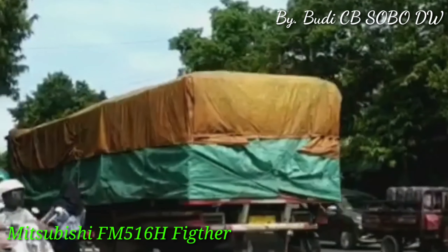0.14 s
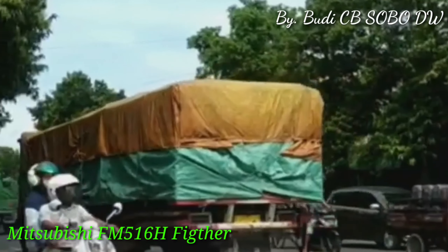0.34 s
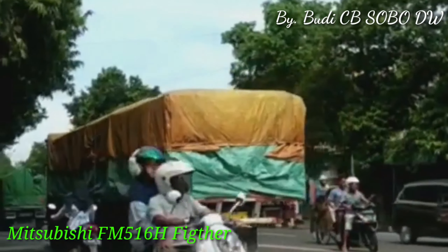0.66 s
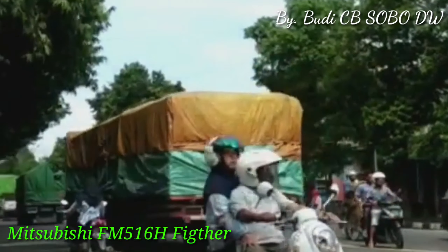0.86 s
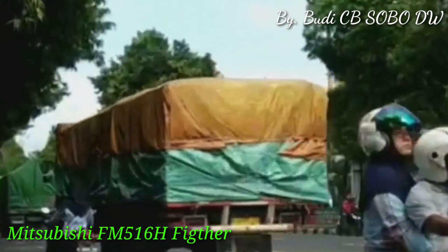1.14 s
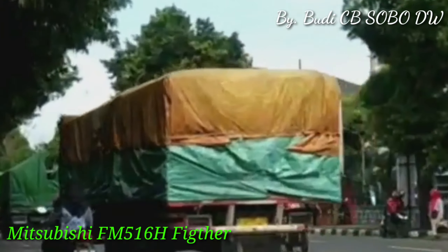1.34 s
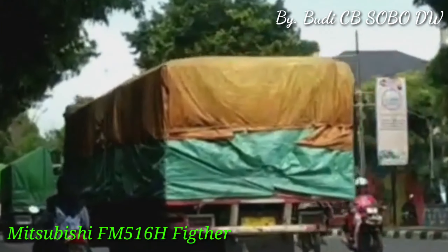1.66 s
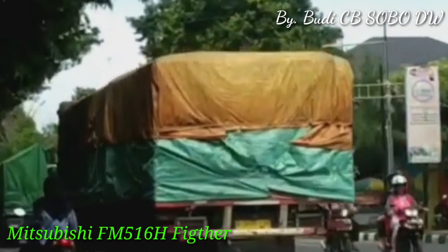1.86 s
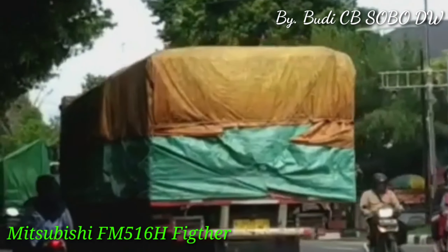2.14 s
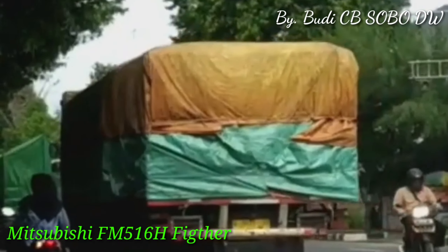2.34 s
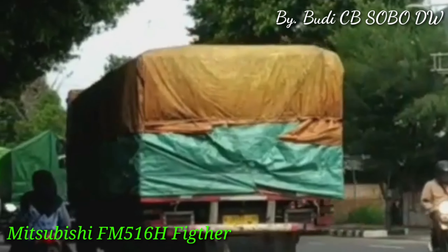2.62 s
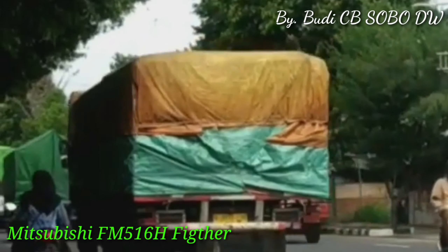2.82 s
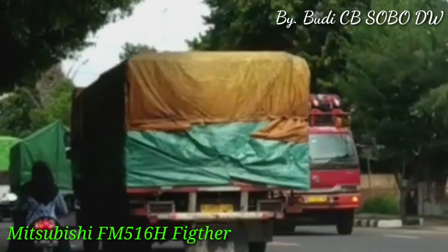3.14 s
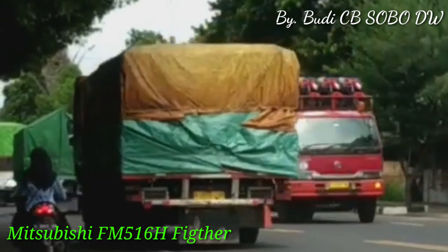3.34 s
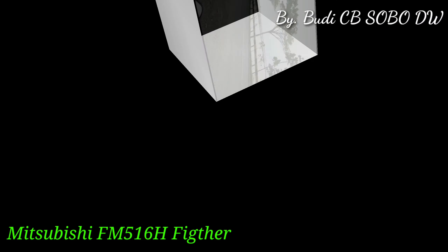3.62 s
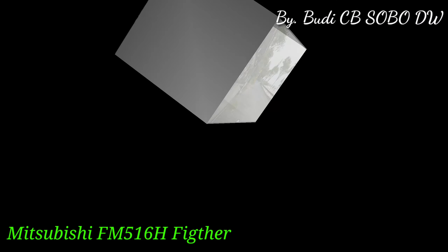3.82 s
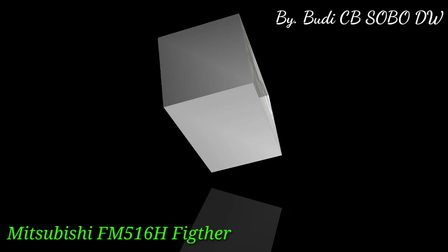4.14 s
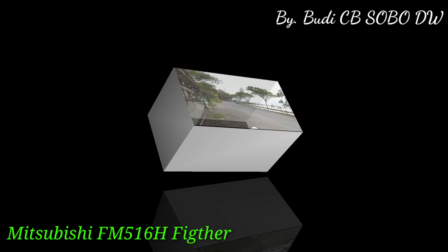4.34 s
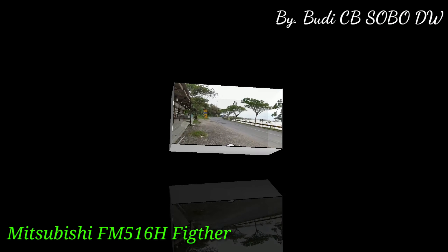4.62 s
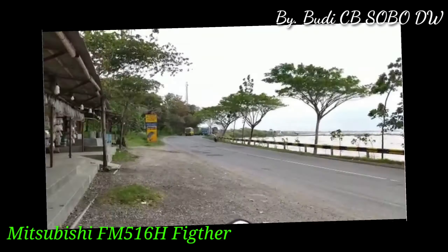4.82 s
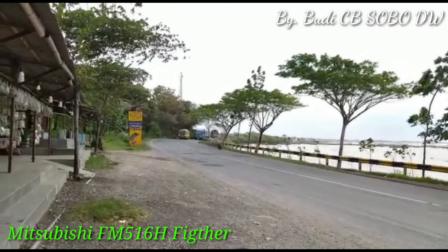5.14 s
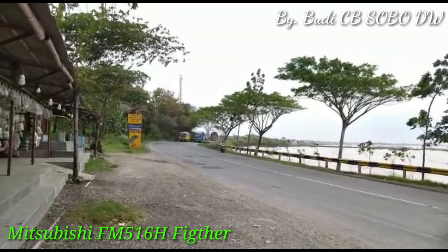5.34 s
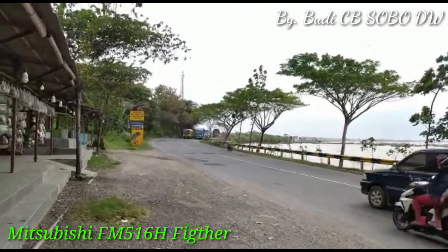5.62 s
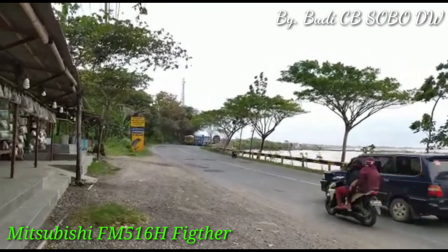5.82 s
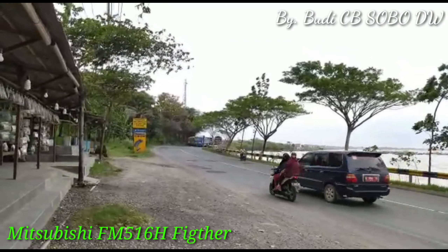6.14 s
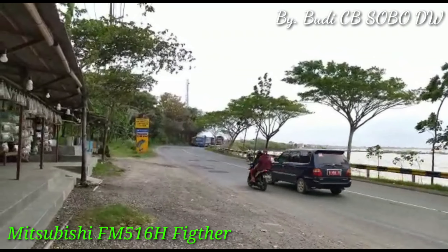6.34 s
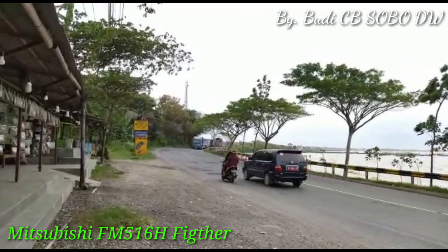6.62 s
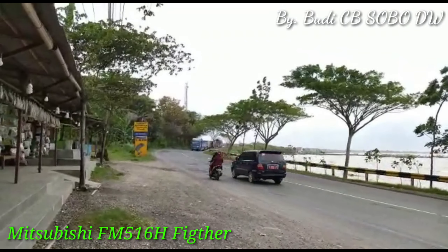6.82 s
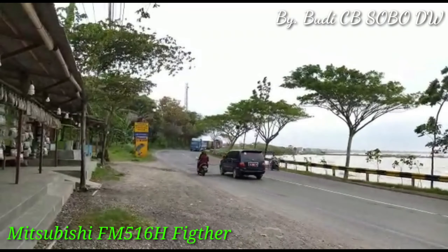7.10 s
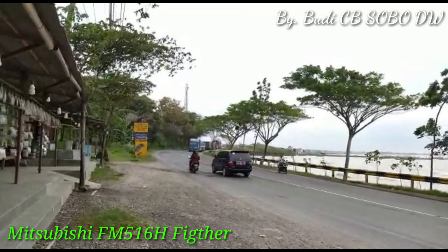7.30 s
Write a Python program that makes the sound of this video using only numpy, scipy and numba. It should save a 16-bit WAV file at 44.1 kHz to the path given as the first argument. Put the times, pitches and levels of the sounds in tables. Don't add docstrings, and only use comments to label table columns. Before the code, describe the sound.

Dense diesel truck roar and puttering mopeds with a quick horn blip, then a sudden cut to a car and moped passing on an open road.

```python
import sys
import numpy as np
from scipy import signal
from scipy.fft import rfft, irfft, next_fast_len
from scipy.io import wavfile
from scipy.ndimage import uniform_filter1d
from numba import njit

SR = 44100
rng = np.random.default_rng(int(sys.argv[2]) if len(sys.argv) > 2 else 0)


def nominal_scale(level):
    x = np.asarray(level, float) / 20
    return 10 ** x


def int16_out(signal):
    q = np.round(np.clip(np.atleast_2d(signal).T, -1, 1) * 32767)
    wavfile.write(sys.argv[1], SR, q.astype(np.int16))


N = 329427
TIME = np.arange(N) / SR
CUT_S = 3.4885
HORN_S = 1.309
# frequency [Hz], left-right correlation.
LIKENESS = [(30, 0.9), (60, 0.83), (130, 1), (290, .82), (640, .68), (1100, 0.4), (2200, .25), (4500, 0.17),
            (12000, 0.1)]


def level(x, db):
    return x * nominal_scale(db) / np.sqrt(np.mean(x ** 2))


def columns(table):
    s, *rest = np.transpose(table)
    return [np.interp(TIME, s, c) for c in rest]


def over_hz(points, hz):
    f, value = np.transpose(points)
    return np.interp(np.log(hz + 1), np.log(f), value)


def hump(start_s, end_s, edge_s):
    return np.clip((TIME - start_s) / edge_s, 0, 1) * np.clip((end_s - TIME) / edge_s, 0, 1)


def bumps(table):
    return sum(value * np.exp(-.5 * ((TIME - s) / length_s) ** 2) for s, length_s, value in table)


def walk(rate, size, at):
    hold = max(int(1 / rate / (at[1] - at[0])), 1)
    held = np.repeat(rng.standard_normal((size, 400)), hold, axis=1)[:, :len(at)]
    slewed = uniform_filter1d(uniform_filter1d(held, hold), hold)
    return slewed / slewed.std()


@njit
def band(x, hz, width):
    y, b, l = np.empty(len(x)), 0., 0.
    g, k = np.tan(np.pi * hz / SR), width / hz
    for i in range(len(x)):
        v = (b + g * (x[i] - l)) / (1 + g * (g + k))
        b, l, y[i] = 2 * v - b, l + 2 * g * v, k * v
    return y


def ring(x, modes, waver_db=None):
    lift_db = np.zeros(len(modes))
    if waver_db is not None:
        lift_db = waver_db * walk(6, size=len(modes), at=TIME)
    out = 0
    for k, (hz, width_hz, db) in enumerate(modes):
        once = band(x, 1. * hz, 1. * width_hz)
        out = out + (-1) ** k * nominal_scale(db + lift_db[k]) * band(once, 1. * hz, 1. * width_hz)
    return out


def fire(hz, wander, scatter_db, pattern_db):
    turns = np.cumsum(hz * (1 + wander * walk(30, size=1, at=TIME)[0])) / SR
    count = np.arange(1, int(turns[-1]))
    at = np.interp(count, turns, np.arange(N - 0.))
    scatter = scatter_db * rng.standard_normal(N // 50)[count]
    size = nominal_scale(np.resize(pattern_db, len(count)) + scatter)
    pulses = np.zeros(N + 1)
    np.add.at(pulses, at.astype(int), size * (1 - at % 1))
    np.add.at(pulses, at.astype(int) + 1, size * (at % 1))
    return pulses[:N], turns % 1


def place(x, pan_db, width):
    other = np.roll(x, 211)
    return nominal_scale(np.array([[pan_db / 2], [-pan_db / 2]])) * (x + width * other * np.array([[1], [-1]]))


def roar(motion, colour, sides, lead, centres_hz, dips, surge_db, patch_db, flicker_db, share_db):
    away_s = 5.25
    size = next_fast_len(N, real=True)
    hz = np.fft.rfftfreq(size, 1 / SR)
    like = np.clip(over_hz(LIKENESS, hz), 0, .99)
    noise = rfft(rng.standard_normal((2, size)))
    mid, side = noise * np.sqrt([1 + like, 1 - like]) * nominal_scale(over_hz(colour, hz))
    port_lag = np.exp(-1j * np.interp(hz, *np.transpose(lead)))
    pair = np.array([mid + side, (mid - side) * port_lag])
    pair = pair * nominal_scale(over_hz(sides, hz) * np.array([[.5], [-.5]]))
    reference = (hz > 1500) & (hz < 5000)
    pair /= np.sqrt(np.sum(abs(pair[:, reference]) ** 2)) / N
    f, t, cells = signal.stft(irfft(pair, size)[:, :N], SR, nperseg=512, noverlap=384)

    level_db, moves = motion[0], [np.interp(t, TIME, m) for m in motion[1]]
    place_in = np.interp(np.log(f + 1), np.log(centres_hz), np.arange(4))
    db = sum(np.clip(1 - abs(place_in - k), 0, 1)[:, None] * moves[k] for k in range(4))
    dip_db = 0 * f
    for dip_hz, width_hz, depth_db in dips:
        dip_db = dip_db + depth_db * np.exp(-.5 * ((f - dip_hz) / width_hz) ** 2)
    db = db + np.outer(dip_db, np.clip((t - away_s) / 0.2, 0, 1))

    octave = np.log2(np.maximum(f, 86) / 86)
    third = (3 * octave).astype(int)
    treble = np.clip(octave / 4, 0, 1)[:, None]
    db = db + surge_db * walk(18, size=1, at=t) * treble
    db = db + patch_db * walk(3, size=10, at=t)[octave.astype(int)]
    db = db + flicker_db * walk(20, size=2 * 28, at=t).reshape(2, 28, -1)[:, third]
    db = db + moves[4] * treble * np.array([.5, -.5])[:, None, None]
    shaped = signal.istft(cells * nominal_scale(db), SR, nperseg=512, noverlap=384)[1][:, :N]
    return shaped * nominal_scale(level_db + share_db)


def street_motion():
    # time [s], length [s], lift [dB].
    whisks = [(0.178, 0.098, 0.5), (.85, 0.055, -0.5), (1.394, 0.18, 1), (2.16, 0.085, 3.5),
              (2.407, 0.043, 3), (2.72, 0.18, -0.7), (3.005, 0.054, 1.5), (3.219, 0.047, 1),
              (3.424, 0.033, 2.5), (0.331, 0.011, -1.5), (0.547, 0.016, -1.5), (.66, 0.018, -1),
              (0.976, .025, 2), (1.057, .02, 1.5), (1.53, 0.013, 1.5), (1.572, 0.017, -2),
              (1.635, .015, -0.5), (2.055, 0.011, 0.5), (2.272, 0.023, -0.5), (2.34, .012, -2),
              (2.536, 0.02, -1), (2.6, 0.038, 2), (2.705, 0.016, -0.5), (2.839, 0.012, 3),
              (2.89, 0.016, -1.5), (2.961, 0.012, 2), (3.347, 0.017, -3), (3.472, 0.014, -2)]
    street_db, tyre_sink_db_per_s = -24.5, -1.23
    bass_in_db, bass_in_s = -4, 0.22
    hiss_per_whisk, duck_per_whisk = 0.88, -0.23
    whisk_db = bumps(whisks)
    low_db = bass_in_db * np.exp(-TIME / bass_in_s) + duck_per_whisk * whisk_db
    tyre_db = low_db + tyre_sink_db_per_s * (np.minimum(TIME, CUT_S) - CUT_S / 2)
    moves = [low_db, tyre_db, whisk_db - 1.0, hiss_per_whisk * whisk_db - 2.0, 0 * TIME]
    return street_db + 0 * TIME, moves


def street_roar():
    # frequency [Hz], density [dB per Hz].
    colour = [(12, -82.5), (20, -51), (65, -27.5), (206, -1), (328, -5), (431, -4.5), (615, -11), (766, -9),
              (1250, -7.5), (1520, -11), (3300, -12.5), (5000, -14), (7660, -21), (12500, -44),
              (14000, -75)]
    # frequency [Hz], left minus right [dB].
    sides = [(60, 0.5), (110, 1), (200, -1.5), (380, 2.5), (690, 0.5), (1280, -1.5), (2360, 2),
             (4350, -4.5), (8020, 2), (14800, -3.5)]
    # frequency [Hz], phase [rad].
    lead = [(0, 0), (860, 0.2), (1550, 3.0), (1980, 2.3), (2500, 6.0), (3620, 0.9), (5170, -0.3),
            (6370, -9.4), (7580, -12.2), (9730, -15.8), (11300, -18.4), (12300, -25.3), (12900, -25.1),
            (15000, -25.4)]
    out = roar(street_motion(), colour, sides, lead, [400, 1000, 3300, 9000], [],
               surge_db=0.74, patch_db=0.25, flicker_db=1.4, share_db=2.0)
    return out * nominal_scale(-2 * hump(HORN_S, HORN_S + .1, .02))


def truck():
    # time [s], firing rate [Hz], level [dB].
    run = [(0, 68.8, -30.5), (.8, 69.6, -29), (1.05, 69.28, -31), (1.6, 69.45, -27), (2.4, 68.38, -32),
           (3, 69.45, -28), (3.5, 69.67, -32.5)]
    # frequency [Hz], width [Hz], level [dB].
    pipe = [(144, 89, -12), (203, 60, -2), (291.4, 80, -1.5), (413, 118, -3), (707, 67, -12),
            (785, 80, -5.5)]
    hz, db = columns(run)
    pulses, phase = fire(hz, wander=.022, scatter_db=2.5, pattern_db=[0, -6, -2.5])
    knock = np.exp(-phase / 0.36) * band(rng.standard_normal(N), 2500.0, 2300.0)
    exhaust = ring(pulses, pipe, waver_db=2.5)
    return place((level(exhaust, 0) + level(knock, -8.0)) * nominal_scale(db), 3.0, 0.15)


def putter():
    hz = np.interp(TIME, [0, 3.5], [32.5, 31])
    _, phase = fire(hz, wander=0.033, scatter_db=0, pattern_db=[0])
    swell_db = np.interp(TIME, [0, 1.1, 1.6, 2.2, 2.6, 3.5], [-39, -34.0, -36.0, -36.0, -37.0, -34.5])
    puffs = np.array([band(rng.standard_normal(N), 4300., 5000.0) for _ in range(2)])
    return level(np.exp(-phase / 0.22) * puffs, 0) * nominal_scale(swell_db)


def whines():
    # start [s], end [s], frequency [Hz], width [Hz], level [dB].
    tones = [(-.1, .46, 5663, 25, -41.5), (.15, .45, 445, 40, -31), (1.5, 2.2, 525, 40, -33),
             (1.1, 1.8, 443, 18, -31.5), (2.65, 3.25, 370, 18, -29.5), (2.75, 2.95, 3230, 40, -46),
             (4.5, 4.95, 330, 25, -34.5), (5.05, 5.5, 1020, 110, -37), (5.5, 5.92, 2650, 110, -37),
             (5.8, 6.7, 2640, 60, -48), (5.7, 6.3, 2260, 60, -48), (5.6, 6.9, 1500, 90, -47),
             (6.65, 7.6, 70, 10, -44), (.45, .93, 215, 30, -32), (1.15, 1.4, 235, 30, -36),
             (2.85, 3.25, 270, 70, -33), (6.7, 7.6, 4200, 2500, -51), (2.3, 3.45, 4900, 1200, -40),
             (1.95, 2.45, 225, 50, -30), (1.1, 1.55, 540, 110, -33), (2.6, 3.0, 1080, 250, -34),
             (5.0, 5.35, 396, 20, -36), (4.9, 5.9, 350, 120, -34), (.1, .9, 430, 130, -33),
             (5.55, 6.7, 155, 13, -39), (5.65, 6.15, 235, 50, -35), (6.9, 7.6, 205, 20, -41),
             (1.4, 1.95, 205, 30, -33), (3.2, 3.555, 205, 30, -33), (5.2, 5.6, 260, 20, -35),
             (5.95, 6.5, 310, 30, -39), (5.25, 5.5, 190, 20, -36), (5.5, 5.75, 460, 40, -40),
             (3.2, 3.555, 900, 400, -36), (4.05, 4.7, 420, 200, -46), (4.5, 5.3, 1900, 1800, -41),
             (5.2, 5.95, 9300, 3000, -49), (1.15, 1.5, 420, 150, -31), (1.1, 1.42, 780, 250, -34),
             (7.1, 7.6, 12500, 3500, -62), (.15, .5, 800, 250, -36), (.2, .5, 2100, 700, -37)]
    pan_db = 1
    out = 0
    for start_s, end_s, hz, width_hz, db in tones:
        like = np.clip(over_hz(LIKENESS, hz), .6, .99)
        mid, side = (ring(rng.standard_normal(N), [(hz, width_hz, 0)]) * np.sqrt(1 + sign * like)
                     for sign in (1, -1))
        tone = level(np.array([mid + side, mid - side]), db)
        out = out + tone * hump(start_s, end_s, 0.14) * nominal_scale(np.array([[pan_db / 2], [-pan_db / 2]]))
    return out


def horn():
    # frequency [Hz], width [Hz], level [dB].
    bell = [(2750, 300, -8), (3106, 240, 0), (3790, 300, -9), (5300, 900, -14), (8000, 1200, -15),
            (10500, 2000, -27)]
    # frequency [Hz], width [Hz], level [dB].
    rattle = [(3200, 1200, 0), (4400, 900, -3), (5900, 1200, -4), (8200, 1600, -7), (10500, 1500, -15)]
    length_s, buzz_hz, horn_db, rasp_db = .038, 345, -19.5, -7.5
    pulses, _ = fire(buzz_hz + 0 * TIME, wander=0.003, scatter_db=-1.0, pattern_db=[0])
    buzz = level(ring(pulses, bell), 0) * hump(HORN_S, HORN_S + length_s, .012)
    rasp = level(ring(rng.standard_normal(N), rattle), rasp_db)
    rasp = rasp * hump(HORN_S + .012, HORN_S + .05, .006)
    blip = nominal_scale(horn_db) * (buzz + rasp)
    echo = sum(nominal_scale(db) * np.roll(blip, int(s * SR)) for s, db in [(.036, -11.5), (.066, -5), (.09, -18)])
    return place(blip + echo, 0, 1.0)


def road_motion():
    road_db, nearest_s, kerb_m, speed_m_s = -32, 5.39, 8.5, 9.8
    far_rumble, far_tyre, far_hiss = 0.34, 0.19, -0.034
    behind_tyre_db, behind_hiss_db = 5.5, -1.5
    swing_db = 0.5
    fade_start_s, fade_end_s, fade_power = 3.492, 4.87, 1.61
    since_s = TIME - nearest_s
    along_m = speed_m_s * since_s
    distance_m = np.hypot(along_m, kerb_m)
    loss_db = 20 * np.log10(distance_m / kerb_m)
    fade = np.clip((TIME - fade_start_s) / (fade_end_s - fade_start_s), 1e-4, 1)
    behind = np.clip(since_s / 0.35 + 0.19, 0, 1)
    hiss_behind = np.clip(since_s / 0.85, 0, 1) - .3
    moves = [far_rumble * (loss_db - 3.5),
             far_tyre * loss_db + behind_tyre_db * behind - 1.0,
             0 * TIME,
             far_hiss * (loss_db - 17.0) + behind_hiss_db * hiss_behind,
             swing_db * np.clip(-along_m / distance_m, 0, 1) * 2.5]
    return road_db - loss_db + 20 * fade_power * np.log10(fade), moves


def road_roar():
    # frequency [Hz], density [dB per Hz].
    colour = [(20, -12), (59, -7.5), (109, -14), (148, -4.5), (264, -5.5), (401, -8), (487, -11.5),
              (1050, -13.5), (1250, -13.5), (1500, -12.5), (2700, -16.5), (3000, -20), (4200, -26.5),
              (5760, -32.5), (8000, -25.5), (10300, -24), (15300, -52)]
    # frequency [Hz], left minus right [dB].
    sides = [(60, -2.5), (110, 1.5), (200, 0), (380, -1.5), (690, 0), (1280, 3), (2360, 4), (4350, 1.5),
             (8020, -2), (14800, 3.5)]
    # frequency [Hz], phase [rad].
    lead = [(0, 0), (690, -0.2), (1030, 0.6), (1550, 4.9), (1810, 3.0), (2580, 6.9), (4130, -1.0),
            (5250, 0.0), (6890, -8.8), (7580, -13.3), (8960, -12.1), (10200, -23.9), (12600, -30.3),
            (15000, -40.0)]
    # frequency [Hz], width [Hz], depth [dB].
    ground_dips = [(1210, 80, -6), (1850, 300, -4.5), (3150, 250, -3), (560, 70, -3), (1450, 250, -1.5),
                   (2350, 200, -1.5)]
    return roar(road_motion(), colour, sides, lead, [400, 900, 2400, 9000], ground_dips,
                surge_db=-0.4, patch_db=1.55, flicker_db=1.06, share_db=2.5)


def passer(run, pipe, pattern_db):
    hz, db = columns(run)
    pulses, _ = fire(hz, wander=0.022, scatter_db=3.5, pattern_db=pattern_db)
    exhaust = level(ring(pulses, pipe, waver_db=2.5), 0)
    return place(exhaust * nominal_scale(db + road_motion()[0]), 0.92, 0.067)


def car():
    # time [s], firing rate [Hz], level over the road roar [dB].
    run = [(3.6, 64.35, 3), (4.5, 64.34, -6.5), (5.1, 66.44, -1), (5.35, 66.42, 2.5), (5.8, 65, 1.5),
           (6.3, 65, -1.5), (7.47, 63.5, -3.5)]
    # frequency [Hz], width [Hz], level [dB].
    pipe = [(65, 28, -13), (188, 74, -6.5), (261.3, 30, -1.5), (401.5, 50, -9)]
    return passer(run, pipe, pattern_db=[0, -1.5])


def moped():
    # time [s], firing rate [Hz], level over the road roar [dB].
    run = [(3.6, 40, 2), (5, 39.52, -4), (5.8, 39.22, -5), (6.6, 38.97, 0.5), (6.8, 35.6, -1),
           (7.47, 35.2, -1.5)]
    # frequency [Hz], width [Hz], level [dB].
    pipe = [(40, 50, -13), (72.6, 26, -11.5), (167.7, 67, -0.5), (300.4, 38, 0), (542, 120, -10.5)]
    return passer(run, pipe, pattern_db=[0])


def gusts():
    # time [s], length [s], level [dB].
    puffs = [
        (4.929, 0.004, -22),
        (4.964, 0.0081, -20),
        (5.135, 0.0027, -22),
        (5.345, 0.0074, -27),
        (5.989, 0.0076, -28),
    ]
    shape = bumps([(s, length_s, nominal_scale(db)) for s, length_s, db in puffs])
    air = [ring(rng.standard_normal(N), [(228, 390, 0)]) for _ in range(2)]
    ports = np.array([air[0] + 0.46 * air[1], 0.6 * air[0] - 0.33 * air[1]])
    return level(ports, 0) * shape


def scene():
    street = street_roar() + truck() + putter() + horn()
    road = road_roar() + car() + moped() + gusts()
    return street * (TIME < CUT_S + .035) + road * (TIME > CUT_S + .092) + whines()


def starve(x, band_db, frame_db, size=1024, lead=302):
    # frequency [Hz], step over the usual line size [dB].
    street_step = [(300, -10), (1100, -3), (1600, 4), (2200, 4), (4500, 3), (6000, 7.5), (9000, 10.5),
                   (11000, 14), (13000, 18.5), (13400, 50)]
    # frequency [Hz], step over the usual line size [dB].
    road_step = [(300, -10), (1500, -1), (3000, 3), (4500, 6), (7200, 9), (8200, 4), (10500, 5), (12000, 8),
                 (15400, 10.5), (15600, 40)]
    n, k = np.arange(2 * size), np.arange(size)
    window = signal.windows.kaiser_bessel_derived(2 * size, 4 * np.pi)
    basis = window[:, None] * np.cos(np.pi / size * np.outer(n + .5 + size / 2, k + .5))
    count = (N + lead) // size + 2
    padded = np.pad(x, ((0, 0), (size + lead, (count + 1) * size - N - lead)))
    halves = padded.reshape(2, -1, size)
    lines = np.concatenate([halves[:, :-1], halves[:, 1:]], axis=2) @ basis

    def smooth(power, over_frames, over_lines):
        return uniform_filter1d(uniform_filter1d(power, size=over_frames, axis=1), size=over_lines, axis=2)

    usual = np.sqrt(abs(smooth(lines ** 2, 5, 41))) + 1e-9
    frame_s, hz = np.arange(lines.shape[1]) * size / SR, (k + .5) * SR / 2 / size
    step_db = np.where(frame_s[:, None] < 3.56, over_hz(street_step, hz), over_hz(road_step, hz))
    group = np.clip(walk(18, size=size // 8, at=frame_s), -2, 1.5).T
    patch_db = band_db * np.repeat(group, 8, axis=1)
    patch_db *= np.interp(hz, [1000, 2000, 2600, 4500, 5800], [.4, .8, .5, .55, 1])
    step = usual * nominal_scale(step_db + patch_db + frame_db * walk(15, size=1, at=frame_s).T)
    kept = np.round(lines / step) * step
    before, left = (smooth(v ** 2, 15, 61) + 1e-18 for v in (lines, kept))
    back = (kept * np.sqrt(np.clip(before / left, 0, 3))) @ basis.T * (2 / size)
    return (back[:, 1:, :size] + back[:, :-1, size:]).reshape(2, -1)[:, lead:lead + N]


def low_pass(x):
    return signal.sosfilt(signal.butter(12, 15490, fs=SR, output="sos"), x)


def record(dry):
    rumble_cut = signal.butter(1, 12, "high", fs=SR, output="sos")
    squeezed = signal.sosfilt(rumble_cut, starve(dry, band_db=5, frame_db=1.2))
    dull = signal.sosfilt(signal.butter(3, 520, fs=SR, output="sos"), squeezed)
    smear = hump(CUT_S + .001, CUT_S + .06, .009)
    cut_db = np.interp(TIME - CUT_S, [0, .0015, .012, .022, .03, .07, .09, .15, .24],
                       [0, -27, -36, -58, -90, -90, -10, -4, 0])
    edited = (squeezed + smear * (dull - squeezed)) * nominal_scale(cut_db)
    return low_pass(edited)


dry = scene()
out = record(dry)
int16_out(out)
```